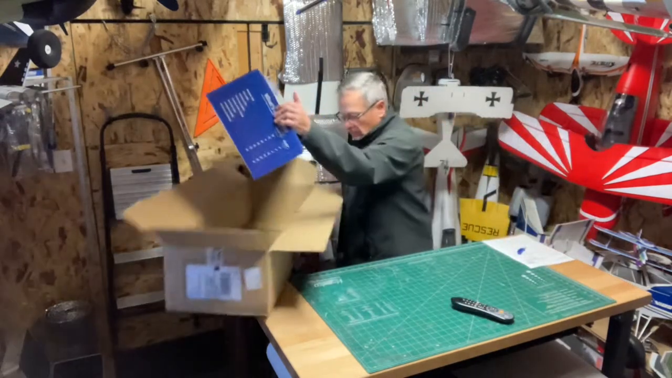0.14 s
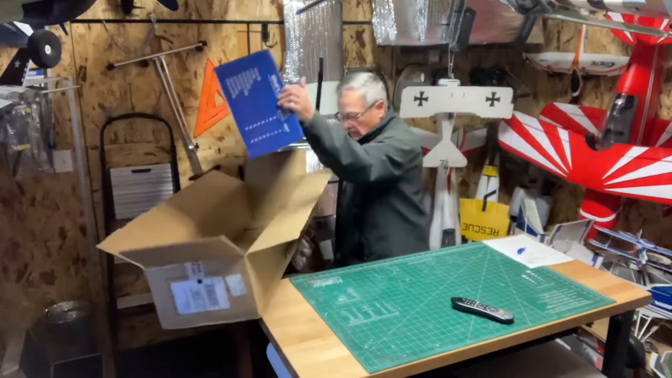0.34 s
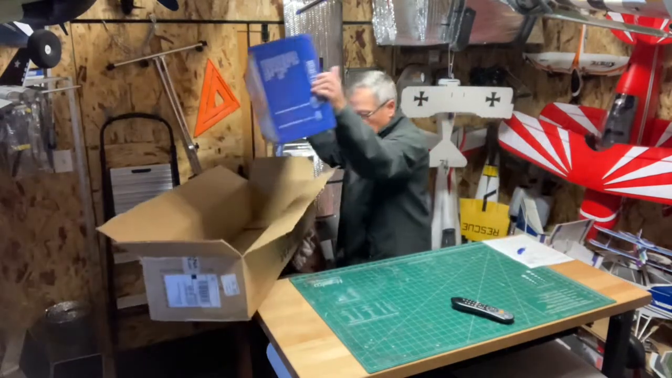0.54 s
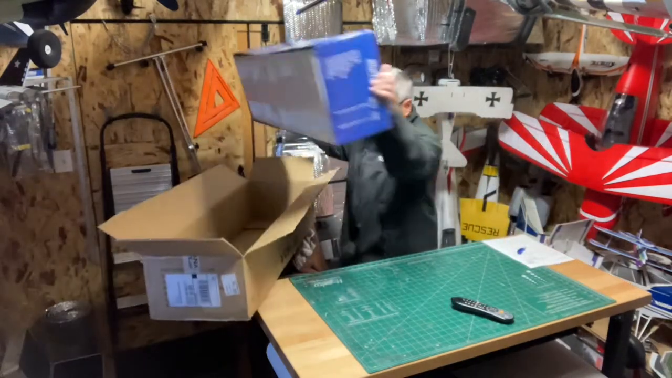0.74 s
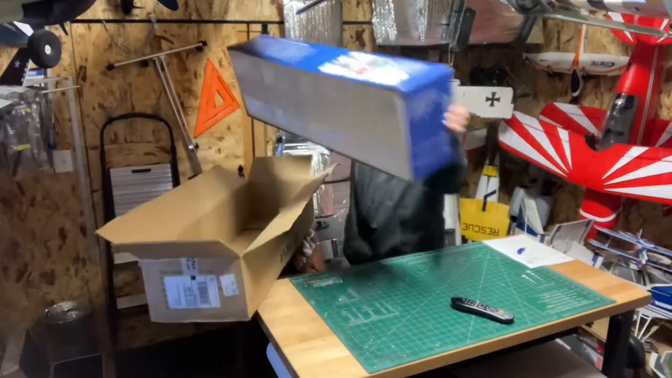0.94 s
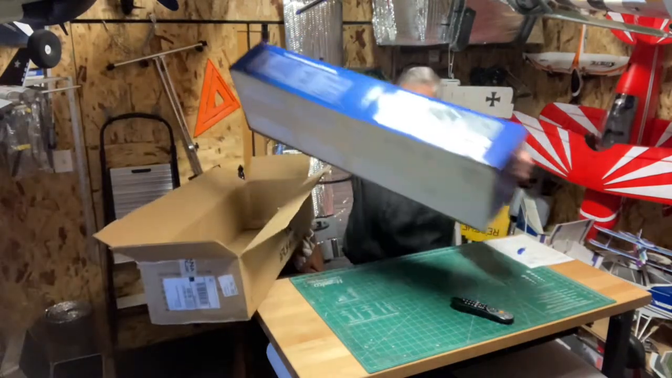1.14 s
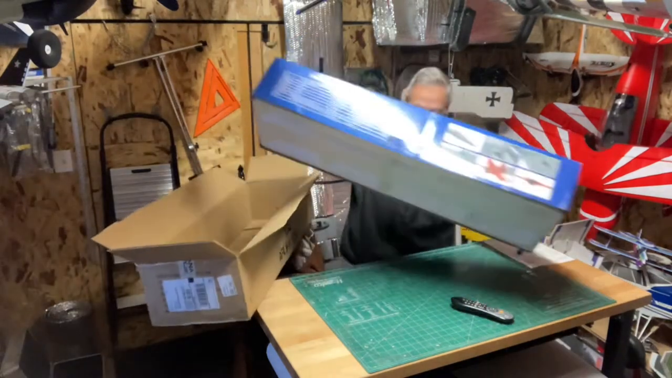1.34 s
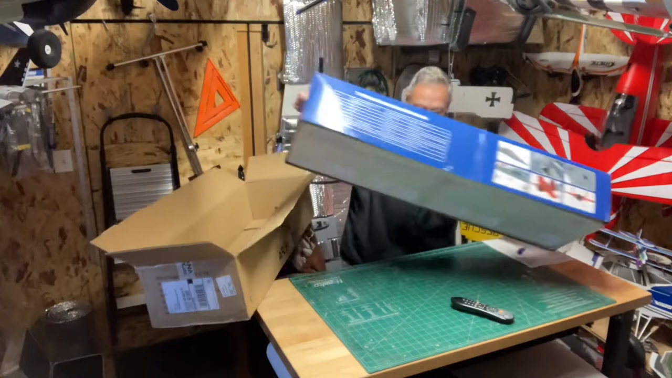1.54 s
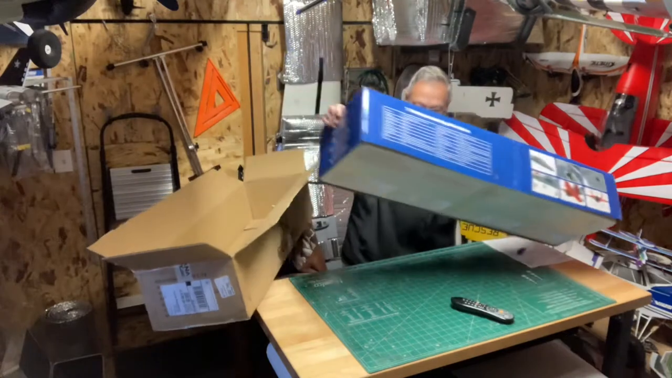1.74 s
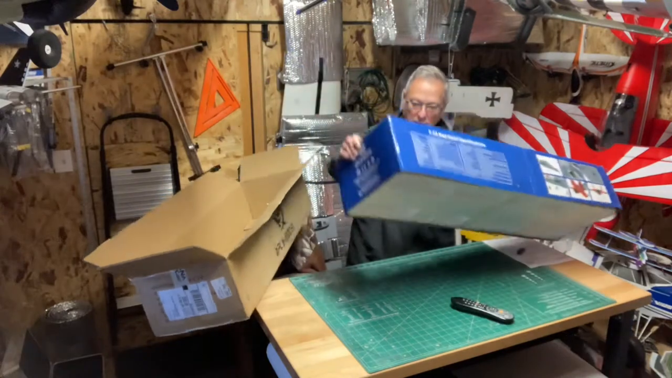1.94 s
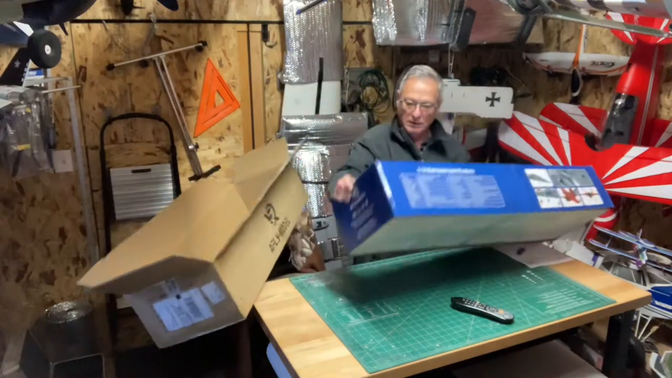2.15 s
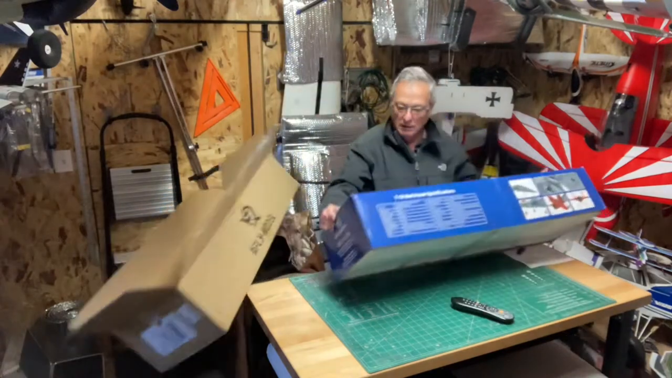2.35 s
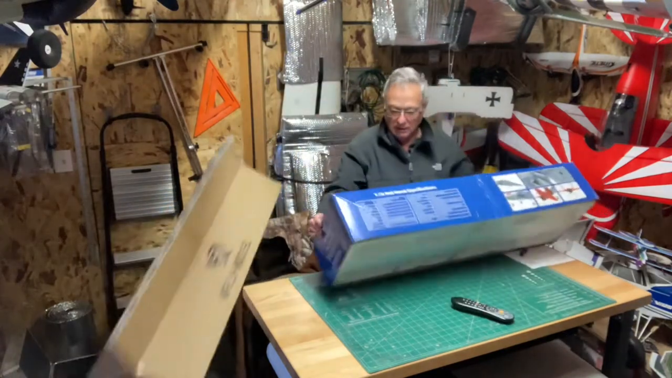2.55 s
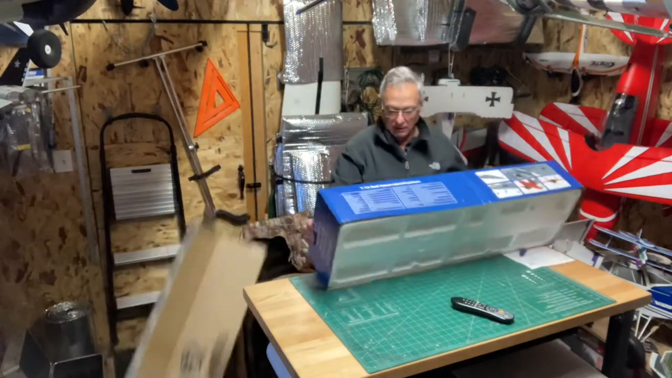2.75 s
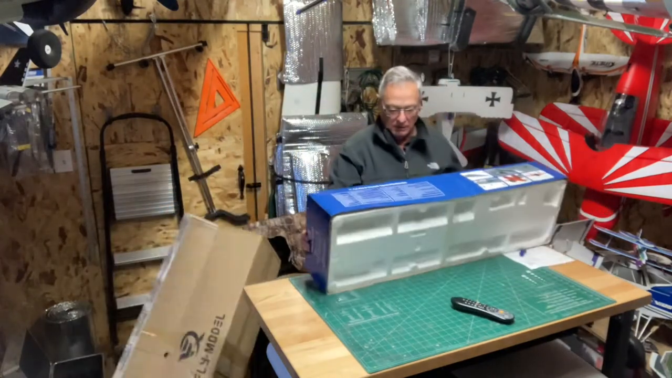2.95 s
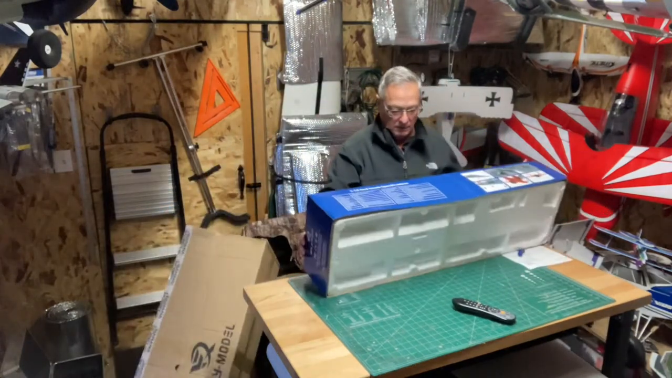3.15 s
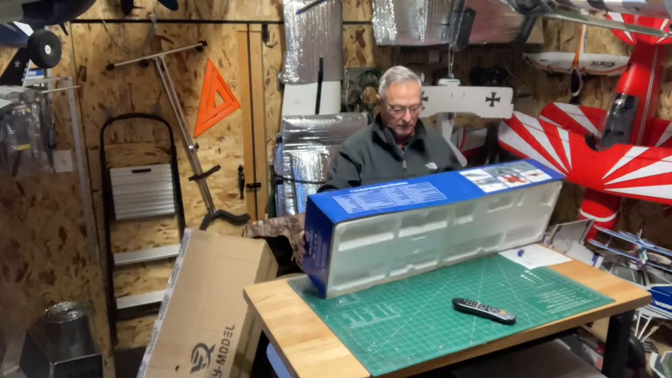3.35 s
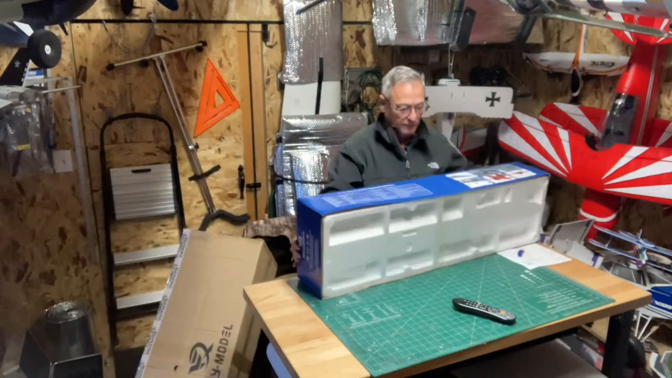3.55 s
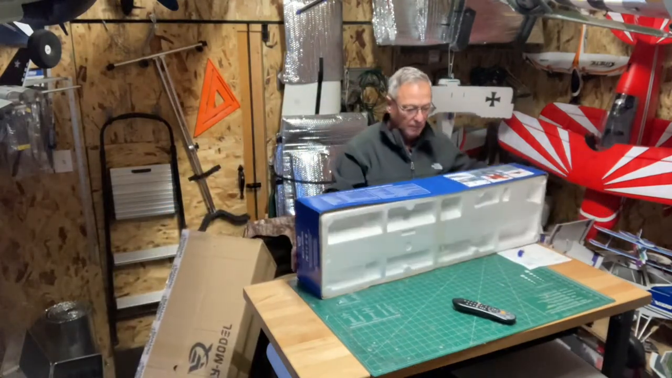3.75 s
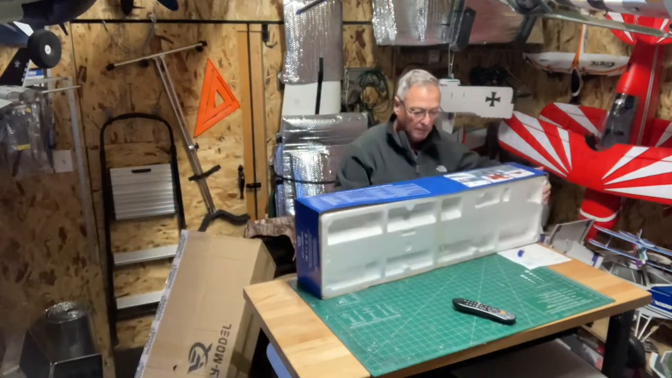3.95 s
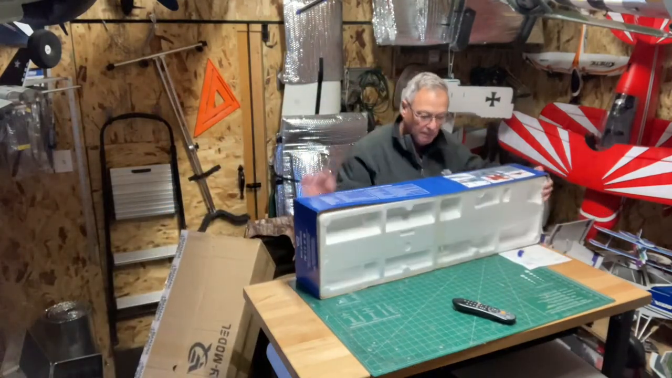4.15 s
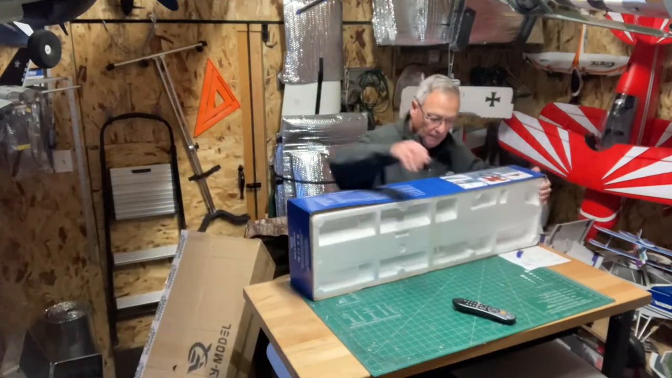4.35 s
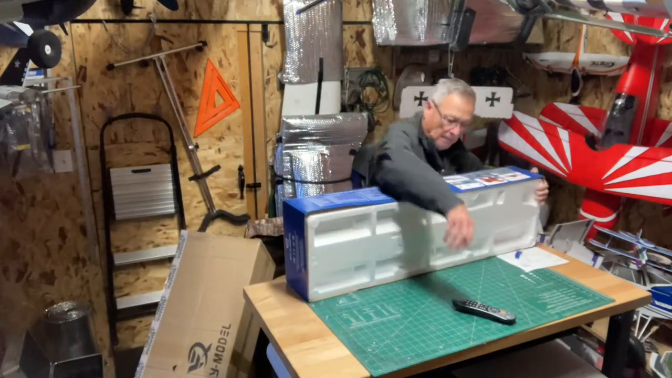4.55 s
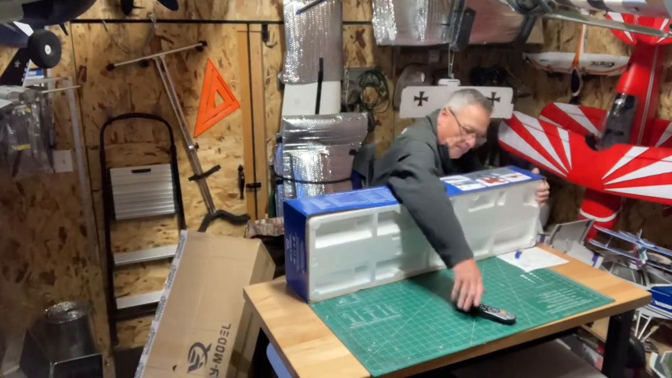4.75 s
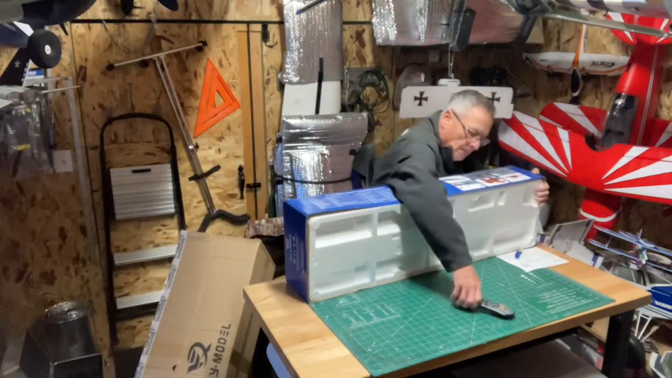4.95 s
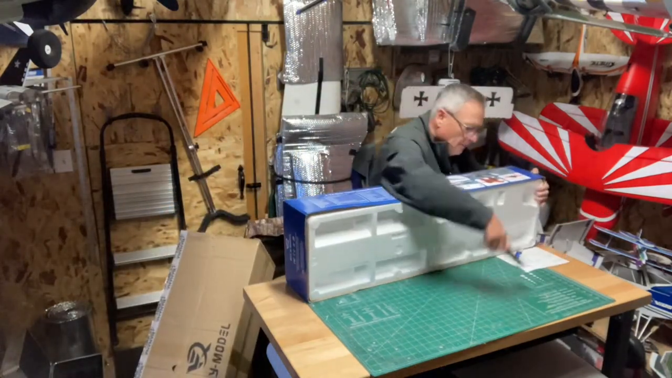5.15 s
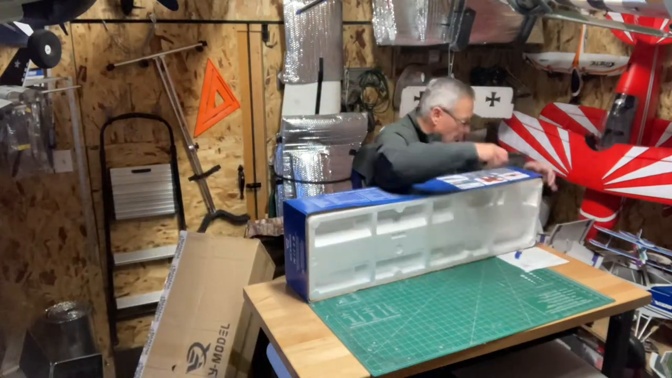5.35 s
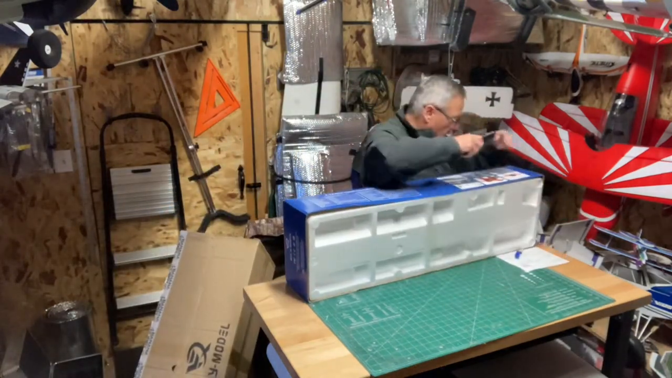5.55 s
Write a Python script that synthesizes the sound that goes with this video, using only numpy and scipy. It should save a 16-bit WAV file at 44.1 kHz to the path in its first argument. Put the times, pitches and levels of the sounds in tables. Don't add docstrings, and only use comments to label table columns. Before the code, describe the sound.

Foam squeals and cardboard scuffs, a quiet pause, then an empty box drops and booms, followed by taps and brushing on a carton.

```python
import sys
import numpy as np
from scipy import signal
from scipy.fft import rfft, irfft, next_fast_len
from scipy.io import wavfile
from scipy.ndimage import uniform_filter1d, minimum_filter1d

SR = 44100
rng = np.random.default_rng(int(sys.argv[2]) if len(sys.argv) > 2 else 0)


def inscribe(sig):
    pcm = np.round(np.clip(np.atleast_2d(sig).T, -1, 1) * 32767)
    wavfile.write(sys.argv[1], SR, pcm.astype(np.int16))


def boost(x):
    u = np.asarray(x, float) / 20
    return 10 ** u


N = 246959

# (frequency [Hz], level [dB per Hz])
SCRAPE = [(350, -26.5), (750, -4.5), (981, -3), (1080, -4), (1320, -4.5), (1430, -5), (2500, -7.5),
          (4240, -8.5), (6000, -16), (7800, -41), (13200, -120)]
# (frequency [Hz], level [dB per Hz])
HISS = [(4500, -10.5), (6000, 2.5), (7000, 2), (8300, 4.5), (9500, 4.5), (11000, 2.5), (13500, 1),
        (15200, -5), (16400, -5), (17000, -60)]


def evened(x):
    return x / np.sqrt(np.mean(x ** 2) + 1e-20)


def read(points, hz):
    f, value = np.transpose(points)
    return np.interp(np.log(hz + 1), np.log(f + 1), value)


def add(mix, s, sound):
    part = mix[..., round(s * SR):][..., :sound.shape[-1]]
    part += sound[..., :part.shape[-1]]


def colour(x, points):
    hz = np.abs(np.fft.fftfreq(4096, 1 / SR))
    log_gain = np.log(boost(np.maximum(read(points, hz), -100)))
    minimum_phase = -signal.hilbert(log_gain).imag
    taps = np.fft.ifft(np.exp(log_gain + 1j * minimum_phase)).real[:2048]
    taps = taps / np.linalg.norm(taps)
    return signal.oaconvolve(x, taps[None], axes=-1)[:, :x.shape[-1]]


def ports(x):
    # (frequency [Hz], likeness [0 to 1])
    likeness = [(60, .98), (130, .95), (290, .9), (640, .45), (1400, .45), (2500, .2), (4800, .25),
                (6200, .6), (8000, .9), (15000, .93)]
    size = next_fast_len(N)
    z = rfft(x, size)
    same = np.clip(read(likeness, np.fft.rfftfreq(size, 1 / SR)), 0, 1)
    right = same * z[0] + np.sqrt(1 - same ** 2) * z[1]
    return irfft([z[0], right], size)[:, :N]


def floor():
    # (frequency [Hz], level [dB per Hz])
    room_tone = [(18, -15), (30, -10), (66, 7), (268, -14), (409, -12.5), (659, -10), (1530, -13),
                 (3300, -32), (4770, -27), (6380, -27), (9230, -27.5), (10800, -30), (13700, -31),
                 (16500, -32)]
    size = next_fast_len(N)
    z = rfft(rng.standard_normal((2, size)))
    z = z * boost(read(room_tone, np.fft.rfftfreq(size, 1 / SR)))
    return boost(-71.5) * evened(ports(irfft(z, size)[:, :N]))


def slips(per_s, spread_db, smooth):
    grain_fade_s = 0.0053
    size = boost(spread_db * np.minimum(rng.exponential(1, N), 4))
    size = size * (rng.random(N) < per_s / SR)
    grains = signal.lfilter([1], [1, -np.exp(-1 / (grain_fade_s * SR))], size)
    return rng.standard_normal((2, N)) * (smooth + evened(grains))


def ring(x, peaks):
    out = 0
    for hz, width, db in peaks:
        r = np.exp(-np.pi * width / SR)
        turn = 2 * np.pi * hz / SR
        gain = boost(db) * (1 - r) * np.sin(turn)
        out = out + gain * signal.lfilter([1], [1, -2 * r * np.cos(turn), r * r], x)
    return out


def patchy(x, depth_db, frames, bins):
    z = signal.stft(x, nperseg=512)[2]
    field = uniform_filter1d(rng.standard_normal(z.shape[1:]), bins, 0)
    field = uniform_filter1d(field, frames, 1)
    return signal.istft(z * boost(depth_db * evened(field)), nperseg=512)[1][:, :N]


def crackle(per_s):
    clumps = boost(6.0 * evened(uniform_filter1d(rng.standard_normal(N), 1500)))
    size = boost(4.0 * np.minimum(rng.exponential(1, N), 4))
    size = size * (rng.random(N) < per_s * clumps / SR)
    return evened(size * rng.choice([-1., 1.], (2, N)))


def pressure(t, share_column, haste):
    # (peak time [s], time to fade 20 dB [s], pressure [dB], panel share [dB], grit share [dB])
    jolt_table = [(0.775, 0.0838, -47.5, -34, -1), (1.053, 0.12, -57, 1, -7.5), (1.715, 0.14, -63, 3, -2.5),
                  (2.394, 0.2032, -47, 9.5, -8), (2.737, 0.1338, -34.5, 1.5, -4),
                  (2.86, 0.1763, -39.5, -3.5, -5), (2.949, 0.2629, -48, 6, 0),
                  (3.633, 0.35, -52.5, -2.5, -4.5), (3.824, 0.04, -50, -27.5, -5),
                  (3.923, 0.07, -56.5, 6.5, -12), (4.222, 0.46, -53, -4, -7.5),
                  (4.413, -0.08, -55, -2, -5.5), (4.592, 0.4, -53, -7.5, -5),
                  (5.317, -0.07, -51.5, -26, -5)]
    # (peak time [s], time to fade 20 dB [s], pressure [dB], panel share [dB], grit share [dB])
    stroke_table = [(0.01, 0.0876, -46.5, -6.5, 3.5), (0.05, 0.03, -51, -15.5, 7),
                    (0.088, 0.112, -42.5, -4, 2), (0.174, 0.0878, -44, 4, -0.5),
                    (0.298, 0.1244, -51.5, -4.5, 3.5), (0.569, 0.4, -64.5, 3, -12),
                    (.72, 0.32, -64.5, -27, -14.5), (1.178, 0.02, -62.5, 10.5, -25.5),
                    (1.49, 0.2, -69, 0, -15), (1.9, 0.34, -70, -5, -4), (2.36, 0.31, -55, -1, -7),
                    (2.42, 0.1037, -50, -8, -3.5), (2.556, 0.09, -53, -8, -1),
                    (2.58, 0.0625, -37.5, -3.5, 1), (2.767, -0.07, -59, -8, -12), (2.8, 0.1, -43, -9, -3.5),
                    (2.686, 0.21, -53, 0, -3), (3.045, 0.01, -43, -7, 0), (3.073, 0.12, -43.5, 0.5, -1.5),
                    (3.216, -0.19, -51, -13, 0.5), (.125, .1, -47.5, -6, 5), (3.388, 0.2284, -48, 1, -6.5),
                    (4.028, 0.14, -59, -3.5, -9), (4.09, 0.21, -60, -25.5, 6.5),
                    (4.377, 0.13, -52, -0.5, -5.5), (4.31, 0.06, -55.5, -4, -1), (4.47, 0.1, -66.5, -5, 0),
                    (4.85, .07, -53.5, -13, -0.5), (4.926, 0.21, -57.5, -21, 3),
                    (4.99, 0.0349, -52.5, 1, 8.5), (5.12, 0.14, -56.5, 0.5, -9),
                    (5.142, 0.17, -57, -9, -0.5), (5.204, 0.04, -51.5, -2.5, -4),
                    (5.24, 0.09, -51.5, -7.5, 1), (4.7, 0.36, -58, 0, -6.5), (4.95, .07, -55, -8, -5),
                    (5.04, 0.6, -68.5, 5, -10), (5.339, 0.07, -56, -12, -4), (5.421, 0.3, -61.5, -15, -3.5)]
    soft_s = 0.21
    lift_s, lift_fade_s = 5.455, 0.033
    power = 0
    for row, sudden in [(r, True) for r in jolt_table] + [(r, False) for r in stroke_table]:
        s, fade_s = row[0], max(row[1], .01)
        db = row[2] + (row[share_column] if share_column else 0)
        rise_share = 0.1 * fade_s / soft_s if sudden else 1
        rise_s = rise_share * fade_s / haste + .0005
        distance = np.maximum((s - t) / rise_s, haste * (t - s) / fade_s)
        power = power + boost(db - 20 * distance) ** 2
    return power * boost(-20 * np.maximum(t - lift_s, 0) / lift_fade_s) ** 2


def handling():
    # (frequency [Hz], width [Hz], level [dB])
    boom_peaks = [(58.3, 3.43, -13), (64, 7.1, 16.5), (84.46, 6.8, 5), (121, 14, -13.5)]
    # (frequency [Hz], width [Hz], level [dB])
    rattle_peaks = [(223, 23, 7.5), (330, 26, -3), (422, 70, 9.5), (482, 138, 15), (593, 55, -23.5)]
    # (time [s], level [dB])
    sway_curve = [(0, -49), (.3, -48), (.47, -65.5), (.9, -69.5), (1.1, -64.5), (2, -72.5), (2.25, -62.5),
                  (2.5, -76), (2.9, -45), (3.7, -57), (3.85, -71.5), (4.3, -83), (4.5, -65), (4.7, -72),
                  (5.6, -70.5)]
    rest_levels = [-96, -86, -89.5]
    crackle_db = -13
    t = np.arange(N) / SR
    steps = np.arange(0, N / SR + .01, .001)

    panel_power = pressure(steps, share_column=3, haste=0.91)
    face_power = pressure(steps, share_column=None, haste=1)
    grit_power = pressure(steps, share_column=4, haste=1.23)
    gains = [boost(np.interp(t, *np.transpose(sway_curve)))]
    for power, db in zip([panel_power, face_power, grit_power], rest_levels):
        gains.append(np.interp(t, steps, np.sqrt(power + boost(db) ** 2)))

    box = ring(ring(slips(34, 2.4, 8.5), boom_peaks), [(70, 95, 0)])
    panels = ring(ring(slips(100.4, 2.5, 11.0), rattle_peaks), [(382.0, 420, 0)])
    panels = patchy(panels, 3.5, frames=8, bins=1)
    faces = evened(slips(250, 1.6, 6.55)) + boost(crackle_db) * crackle(400)
    faces = patchy(colour(faces, SCRAPE), 3.0, frames=6, bins=3)
    grit = evened(slips(300, 9.0, 5.3)) + boost(crackle_db + 2.5) * crackle(280)
    grit = patchy(colour(grit, HISS), 3.0, frames=7, bins=4)
    return ports(sum(evened(x) * gain for x, gain in zip([box, panels, faces, grit], gains)))


def resonate(x, hz, width):
    turn = np.exp(2j * np.pi * np.cumsum(hz) / SR)
    r = np.exp(-np.pi * width / SR)
    return 2 * (turn * signal.lfilter([1 - r], [1, -r], x / turn)).real


def squeal():
    # (time [s], low ridge [Hz], sliding ridge [Hz], high ridge [Hz], level [dB])
    foam_path = [
        (0, 1110, 1940, 4000, -42.5),
        (0.029, 1160, 2000, 4000, -37.5),
        (0.047, 1274, 3550, 3840, -34),
        (0.068, 1190, 2400, 4140, -35),
        (.088, 1183, 1840, 4320, -43.5),
        (.12, 1150, 1660, 4470, -45.5),
        (0.158, 1160, 2460, 3730, -34.5),
        (0.202, 1160, 2500, 4460, -44.5),
        (.25, 1087, 2171, 4100, -65),
    ]
    # (width [Hz], level [dB])
    ridge_levels = [(90, -6), (400, -3), (400, 4)]
    s, *ridges, db = np.transpose(foam_path)
    t = np.arange(round(s[-1] * SR)) / SR
    drive = slips(162.0, 9.1, 1.0)[:, :len(t)]
    out = 0
    for hz, (width, ridge_db) in zip(ridges, ridge_levels):
        out = out + boost(ridge_db) * evened(resonate(drive, np.interp(t, s, hz), width))
    out = evened(out) * boost(np.interp(t, s, db))
    return ports(np.pad(out, ((0, 0), (0, N - len(t)))))


def modes(t, hz, db, t60, rise_s, phase=0):
    fade = boost(db[:, None] - 60 * t / t60[:, None])
    tones = fade * np.sin(2 * np.pi * hz[:, None] * t + phase)
    return tones.sum(0) * (1 - np.exp(-t / rise_s)) / np.linalg.norm(boost(db))


def thumps():
    # (time [s], peak level [dB], favoured pitch [Hz], t60 [s])
    landing_table = [(0.001, -13.5, 104, 0.058), (0.028, -20, 76.9, 0.145), (0.165, -26, 70.8, 0.14),
                     (2.413, -25, 73, 0.18), (2.48, -31.5, 57.5, 0.1), (2.582, -34.5, 60.5, 0.16),
                     (2.747, -10, 83, 0.26), (2.747, -23, 123, 0.13), (2.758, -15.5, 53, 0.23),
                     (2.815, -27, 52, 0.2), (2.952, -10.5, 68.3, 0.1), (2.994, -22, 57.7, 0.3),
                     (3.034, -26, 71, 0.14), (3.078, -20, 60, 0.14), (3.129, -27, 51.5, 0.13),
                     (3.307, -34, 70.0, 0.21), (3.408, -29, 66, 0.1), (3.516, -34, 64, 0.088),
                     (3.639, -43, 60, 0.22), (3.963, -49, 70, 0.42), (4.79, -37, 105, 0.15),
                     (4.495, -53, 62.3, 0.3), (5.239, -43.5, 75, 0.2)]
    # (frequency [Hz], level [dB], t60 factor [ratio])
    box_modes = [(55.77, 0.5, 1.24), (82.8, 3.5, 0.5), (130, -6, 0.41), (173, -11.5, 1.5), (256, -31, 0.2),
                 (397, -19.5, 0.26)]
    out, t = np.zeros(N), np.arange(SR // 2) / SR
    hz, db, long = np.transpose(box_modes)
    for s, peak_db, centre_hz, t60 in landing_table:
        near_db = db - 22.5 * abs(np.log2(hz / centre_hz))
        all_hz, all_db = np.r_[centre_hz, hz], np.r_[-6, near_db]
        all_t60 = np.r_[.6, long] * max(t60, .03)
        add(out, s, boost(peak_db) * modes(t, all_hz, all_db, all_t60, rise_s=0.0064))
    return out


def creaks():
    # (time [s], peak level [dB], pitch [Hz], t60 [s])
    creak_table = [(.005, -31.5, 292, 0.099), (.07, -30.5, 1940, 0.055), (.082, -36, 342, 0.12),
                   (.14, -33.5, 395, 0.082), (.32, -45, 330, 0.092), (.138, -31.5, 1132, 0.063),
                   (.537, -50.5, 403, 0.16), (.56, -59, 980, 0.16), (.662, -51.5, 1310, 0.043),
                   (.774, -48, 1150, 0.019), (.775, -47.5, 3320, 0.037), (1.046, -39, 1787, 0.045),
                   (1.058, -36, 695, 0.038), (1.08, -30.5, 397, 0.042), (1.171, -53, 500, 0.069),
                   (1.346, -61, 526, .06), (1.716, -50, 1240, 0.057), (1.738, -46, 395, 0.06),
                   (2.249, -46, 910, 0.042), (2.318, -48, 1160, 0.055), (2.375, -44, 1167, 0.057),
                   (2.388, -34, 1276, 0.053), (2.389, -40, 1930, 0.038), (2.4, -28, 475, 0.072),
                   (2.403, -33, 1448, 0.038), (2.415, -42, 2590, 0.046), (2.737, -29.5, 1480, 0.022),
                   (2.74, -30.5, 2420, 0.064), (2.763, -20, 392, 0.079), (2.78, -28.5, 401, 0.06632),
                   (2.952, -35, 1137, 0.037), (3.075, -46, 1490, 0.024), (3.213, -53.5, 2920, 0.042),
                   (3.242, -37.5, 457, 0.066), (3.292, -45.5, 291, 0.17), (3.599, -33, 350, .04),
                   (3.825, -52, 2990, 0.044), (3.922, -51, 392, 0.037), (4.313, -45, 1223, 0.063),
                   (4.345, -43, 694, 0.052), (4.385, -44, 485, 0.058), (4.422, -37, 780, 0.047),
                   (4.428, -55, 1252, 0.026), (4.63, -47, 537, 0.049), (4.73, -50.5, 2150, 0.02826),
                   (4.85, -48, 994, 0.04), (4.973, -47, 1030, 0.024), (5.13, -49.5, 1518, 0.1),
                   (5.23, -46.5, 1774, .04), (5.554, -62, 3500, .03)]
    # (pitch factor [ratio], level [dB])
    fold_modes = [(1.0, 1), (0.87, -9), (1.19, -5), (2.4, -11)]
    swell_cycles, port_turn = 3.3, 0.53
    out, t = np.zeros((2, N)), np.arange(SR // 12) / SR
    factor, db = np.transpose(fold_modes)
    for k, (s, peak_db, hz, t60) in enumerate(creak_table):
        apart = port_turn * (-1.) ** (k + np.arange(len(factor)))[:, None]
        fade_s = max(t60, .015) / factor
        pair = [modes(t, hz * factor, db, fade_s, swell_cycles / hz, side * apart) for side in (1, -1)]
        add(out, s, boost(peak_db + 3.5) * np.array(pair))
    return out


def ticks():
    # (time [s], peak level [dB], dull part [dB], t60 [s])
    touch_table = [(0.5302, -73.5, 4, 0.33), (0.5992, -71, 7.5, 0.045), (0.66, -71, 21.5, 0.074),
                   (0.775, -40.5, -3.5, 0.046), (0.7975, -43.5, -5.5, 0.049), (1.0491, -43, 2, 0.054),
                   (1.17, -66.5, 8, 0.063), (1.2646, -75, 8.5, 0.057), (1.3421, -70.5, 7, 0.092),
                   (1.581, -65.5, 7, 0.17), (1.7115, -54.5, 2.5, 0.042), (4.412, -59, 11, 0.14),
                   (4.571, -57, -13, 0.54), (4.7292, -38, -7.5, 0.06), (4.82, -50, 3, 0.17),
                   (4.8971, -67.5, -21, 0.2), (4.982, -40, -27, 0.075), (5.0571, -39.5, -6, 0.067),
                   (5.316, -39, -12, 0.068), (5.445, -56, -13, .03), (5.5563, -76.5, 13.5, 0.061)]
    # (time [s], peak level [dB], dull part [dB], t60 [s])
    edge_table = [(2.387, -66, 13, 0.16), (2.54, -41, -2, 0.39), (2.565, -34, -5.5, 0.16),
                  (2.7376, -32, -6, 0.3), (2.846, -27.5, -19, 0.034), (2.8634, -27.5, -5.5, 0.044),
                  (2.9503, -37, 0, 0.1), (3.031, -24, -29, 0.07), (3.169, -48, -2, 0.38),
                  (3.3957, -34, -4, 0.073), (3.442, -42.5, -23.5, 0.2), (3.517, -47, 1, 0.18),
                  (3.6125, -50, 5.5, 0.12), (3.7432, -42, -5, 0.041), (3.823, -40.5, -11, 0.047),
                  (3.921, -39.5, -2, 0.11)]
    # (time [s], peak level
    # [dB], dull part [dB])
    snap_table = [(.529, -62, 4), (1.345, -69, -4), (2.249, -56.5, 7), (2.3886, -48, 7.5),
                  (2.543, -34, -13), (2.74, -35, 0), (2.743, -29, 3), (2.856, -31, -12), (2.952, -36, 3),
                  (3.169, -44, -15), (3.213, -51, -3), (3.355, -40, -3), (3.62, -48, 0), (3.744, -30, -12),
                  (4.06, -54, -12), (4.183, -55, 0), (4.209, -38, -6), (4.305, -51, 1), (4.319, -50, 3),
                  (4.346, -52, 2), (4.583, -52, -3), (4.615, -44, -5), (4.731, -40, -10), (4.791, -56, -1),
                  (4.833, -49.5, -3), (4.984, -40, -15), (5.058, -31, -10), (5.447, -52, -12),
                  (5.411, -56.5, -7.5),
                  (2.8462, -27, -20),
        (2.864, -21, -5),
        (3.0308, -14, -22),
        (3.3975, -27, -12),
        (5.3145, -28, -15),
    ]
    scuff_db, crispness = -5.5, 0.19
    snaps, scuffs = np.zeros((2, N)), np.zeros((2, 2, N))
    t = np.arange(SR // 5) / SR
    for s, peak_db, dull_db, t60 in touch_table + edge_table:
        level = boost(peak_db + np.array([[0], [dull_db + 0.5]]))
        click = boost(-0.5) * (t == 0)
        burst = boost(-1.5 - 60 * t / 0.0074) * np.sign(rng.standard_normal(len(t)))
        add(snaps, s, level * (click + burst))
        scuff = boost(scuff_db + crispness * min(dull_db, 0) - 60 * t / max(t60, .02))
        scuff = scuff * (1 - np.exp(-t / 0.00093))
        add(scuffs, s, (level * scuff)[:, None] * rng.standard_normal((2, len(t))))
    for s, peak_db, dull_db in snap_table:
        add(snaps, s, boost(peak_db + np.array([[0], [dull_db]])))
    snap = colour(snaps[:1], HISS) + colour(snaps[1:], SCRAPE)
    dull_scuff = patchy(colour(scuffs[1], SCRAPE), 2.8, frames=4, bins=3)
    return snap + ports(colour(scuffs[0], HISS) + dull_scuff)


def knocks():
    # (time [s], peak level
    # [dB], pitch [Hz], t60 [s], left over right [dB])
    knock_table = [(1.057, -22.5, 502, 0.055, 1.5), (1.713, -38, 443, 0.055, 1), (2.251, -34, 440, 0.09, 3),
                   (2.342, -48, 492, 0.14, 6), (2.389, -25, 370, 0.099, 1.5), (2.456, -24, 301.7, 0.055, 2),
                   (2.575, -21, 1170, 0.051, -4), (2.744, -20.5, 368, 0.088, 0),
                   (2.861, -29.5, 1540, 0.12, 0), (2.951, -17.5, 432, 0.041, 4),
                   (3.078, -20.5, 334, 0.09, 1.5), (3.524, -36.5, 436, 0.1, 2),
                   (3.615, -31.5, 371, 0.07, 1), (3.656, -27.5, 408, 0.057, 1.5),
                   (3.774, -37, 297, 0.072, 1), (4.412, -29.5, 1303, 0.068, -2),
                   (4.568, -36.5, 980, 0.065, -2), (5.201, -44.5, 1526, 0.3, 1), (5.235, -43, 355, 0.14, 3),
                   (1.199, -54, 222, 0.094, 2), (1.758, -50, 191, 0.11, -5), (2.748, -14.5, 179, 0.16, -2.5),
                  (2.951, -22, 207, 0.14, 2), (3.385, -31, 219, 0.06, 7), (3.549, -37.5, 286, 0.099, 0.5),
                  (3.826, -46.5, 168, 0.15, -4), (3.991, -42.5, 226, 0.14, -2),
                  (4.998, -47.5, 169, 0.14, 3), (5.248, -63, 215, 0.126, -7),
                  (4.808, -30.5, 111.2, 0.19, 4), (1.057, -41.5, 803, 0.15, -9),
                  (1.713, -42, 844, 0.034, -2.5), (2.388, -36.5, 795, 0.1, -23.5)]
    # (pitch factor [ratio], level [dB], t60 factor [ratio])
    panel_modes = [(0.621, -13.5, 2.1), (0.828, -11.5, 1.8), (0.997, 4.5, 0.73), (1.269, -11, 0.9),
                   (1.7, -10, 0.81), (2.1, -20, 1.26), (3.1, -19, 0.74), (4.1, -30, 0.88)]
    out, t = np.zeros((2, N)), np.arange(SR // 6) / SR
    factor, db, long = np.transpose(panel_modes)
    blows = knock_table
    chances = rng.uniform(-1.15, 1, (len(blows), 2, len(factor)))
    for (s, peak_db, hz, t60, pan_db), (detune, turn) in zip(blows, chances):
        tuned = hz * factor * (1 + 0.079 * detune * (db < db.max()))
        apart = 0.6 * np.sign(turn)[:, None] * min(1, hz / 400)
        fade_s = long * max(t60, .02) * min(1, 500 / hz)
        pair = [modes(t, tuned, db, fade_s, 0.88 / hz, side * apart) for side in (1, -1)]
        add(out, s, boost(peak_db + np.array([[pan_db / 2], [-pan_db / 2]])) * pair)
    return out


def shop(x):
    # (frequency [Hz], t60 [s])
    room_fade = [(60, 0.23), (250, 0.23), (1000, 0.27), (4000, 0.16), (12000, 0.17)]
    taps = np.zeros((2, SR // 2))
    starts = np.arange(200, SR // 2 - 20, 20)
    at = starts + rng.integers(0, 20, (2, len(starts)))
    np.put_along_axis(taps, at, rng.choice([-1., 1.], at.shape), 1)
    taps = ports(np.pad(taps, ((0, 0), (0, N - SR // 2))))[:, :SR // 2]
    hz, t, z = signal.stft(taps, SR, nperseg=512)
    tail = signal.istft(z * boost(-60 * t / read(room_fade, hz)[:, None]), SR, nperseg=512)[1]
    return signal.fftconvolve(x, tail / np.linalg.norm(tail[0]), axes=1)[:, :N]


def scene():
    booms = thumps()
    blows = knocks() + ticks() + squeal() + creaks()
    echoes = shop(boost(-6.5) * blows + boost(-5.5) * booms)
    return booms + blows + echoes + handling() + floor()


def low_pass(x):
    return signal.sosfilt(signal.butter(12, 16670, fs=SR, output="sos"), x)


def record(dry):
    # (frequency [Hz], left over right [dB])
    balance = [(60, 3), (180, 2.5), (550, -1.5), (1650, -1.5), (4970, -1), (15000, 1)]
    # (frequency [Hz], phase [radians])
    port_phase = [(0, 0), (1400, .4), (2200, 1.5), (4800, 1.7), (6000, 3.4), (17000, -10)]
    # (frequency [Hz], level [dB])
    starved_mid = [(10550, 0), (11000, -45), (11800, -45), (12200, 0), (15300, 0), (15600, -40)]
    # (frequency [Hz], level [dB])
    starved_side = [(8100, 0), (8500, -45), (9450, -45), (9600, 0), (12900, 0), (13200, -45), (14600, -45),
                    (15000, 0), (15700, 0), (15900, -40)]
    # (frequency [Hz], level [dB])
    frayed_mid = [(11000, 0), (11200, -45), (11650, -45), (11850, 0), (15400, 0), (15750, -40)]
    fray_s, fray_bias = .05, .2
    dry = signal.sosfilt(signal.butter(4, 34, "high", fs=SR, output="sos"), dry)
    size = next_fast_len(N)
    hz = np.fft.rfftfreq(size, 1 / SR)
    db = read(balance, hz) / 2
    turn = np.exp(.5j * np.interp(hz, *np.transpose(port_phase)))
    left, right = rfft(dry, size) * boost(np.array([db, -db])) * [1 / turn, turn]

    z = np.array([left + right, left - right]) / 2
    kept = irfft(z * boost(np.array([read(starved_mid, hz), read(starved_side, hz)])), size)[:, :N]
    edges = irfft(z[0] * boost(read(frayed_mid, hz)), size)[:N] - kept[0]
    narrowed = rng.standard_normal(round(N / SR / fray_s) + 1) > fray_bias
    narrowed = np.repeat(narrowed, round(fray_s * SR))[:N]
    kept[0] += edges * uniform_filter1d(1. * narrowed, 512)

    lost = irfft(z, size)[:, :N] - kept
    power = (irfft(z * (hz > 8000), size)[:, :N] ** 2).mean(0)
    sudden = uniform_filter1d(power, 64) > 4.5 * uniform_filter1d(power, 2048)
    gate = uniform_filter1d(1 - minimum_filter1d(1. - sudden, 700), 128)
    mid, side = kept + boost(4.0) * gate * lost
    return low_pass(np.array([mid + side, mid - side]))


dry = scene()
out = record(dry)
inscribe(out)
```